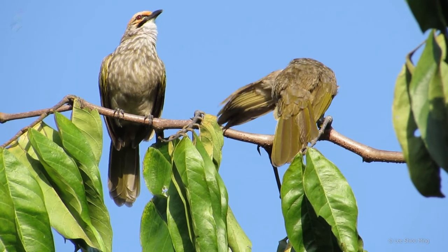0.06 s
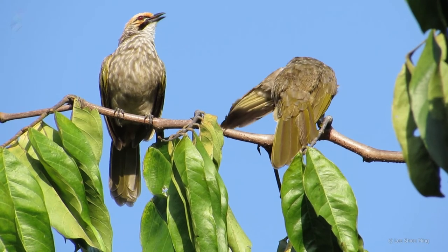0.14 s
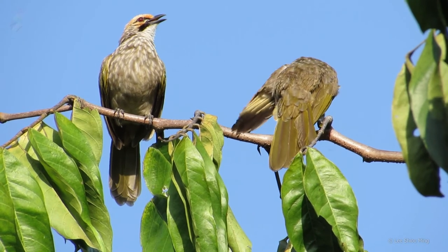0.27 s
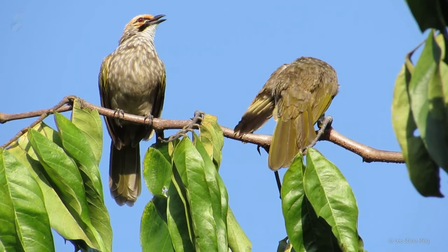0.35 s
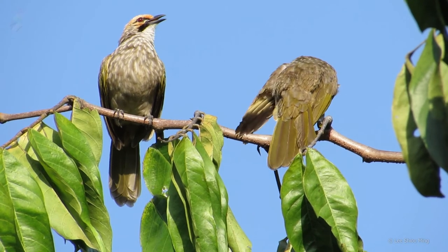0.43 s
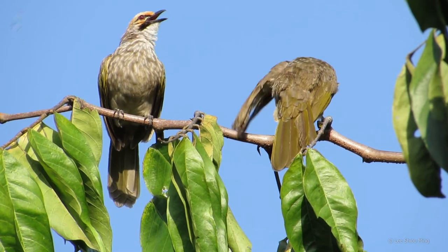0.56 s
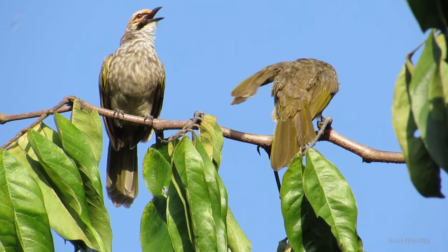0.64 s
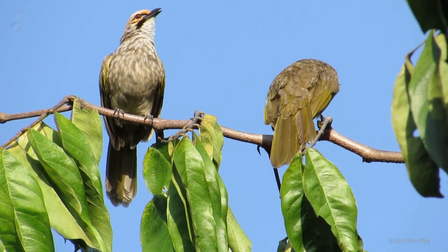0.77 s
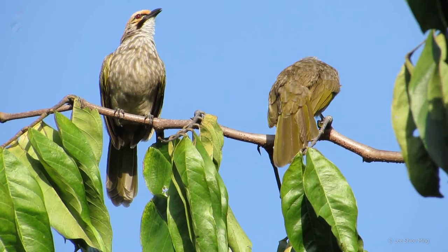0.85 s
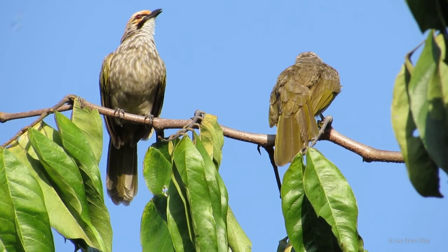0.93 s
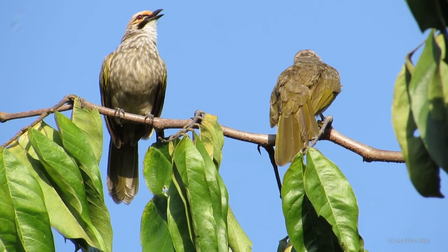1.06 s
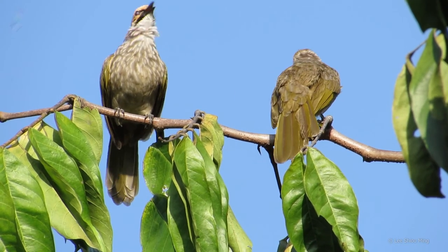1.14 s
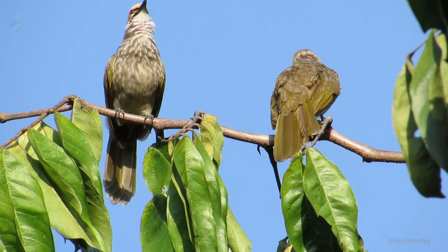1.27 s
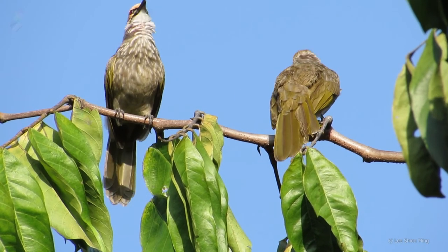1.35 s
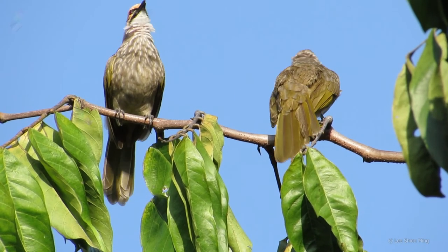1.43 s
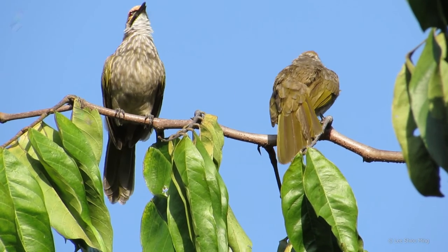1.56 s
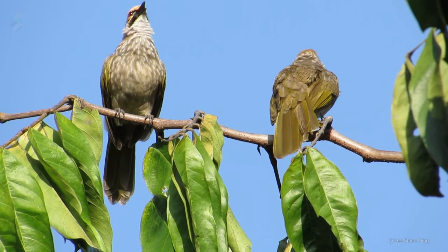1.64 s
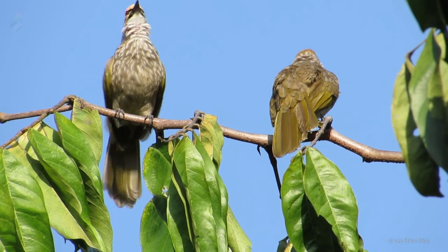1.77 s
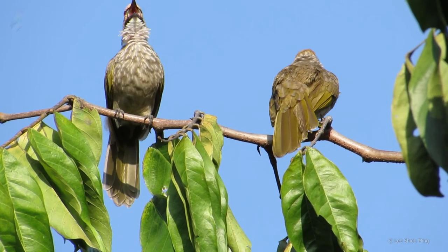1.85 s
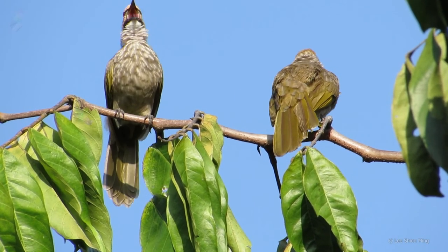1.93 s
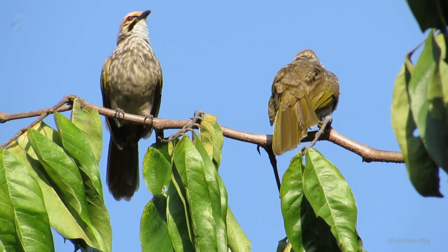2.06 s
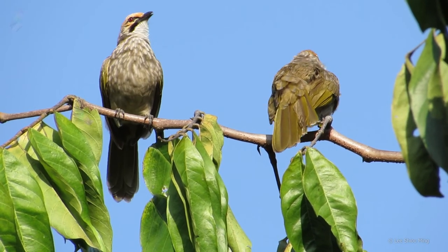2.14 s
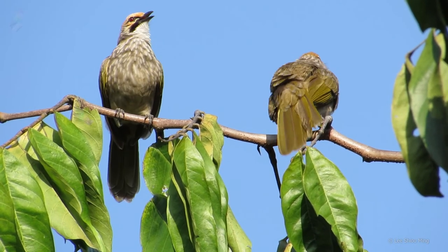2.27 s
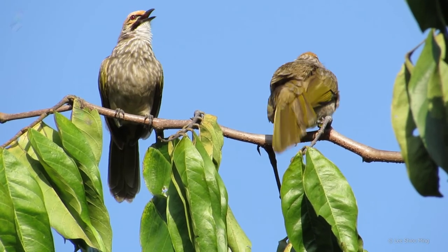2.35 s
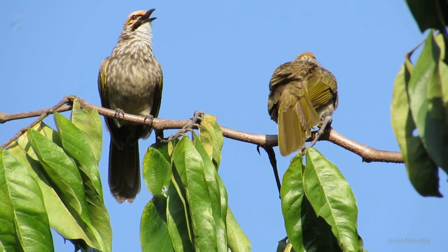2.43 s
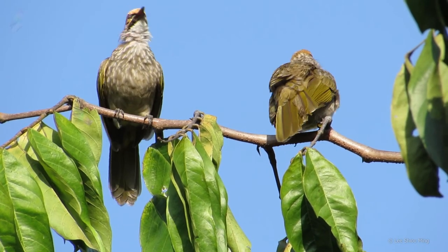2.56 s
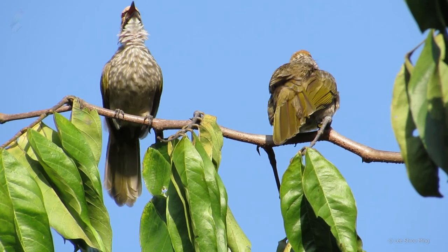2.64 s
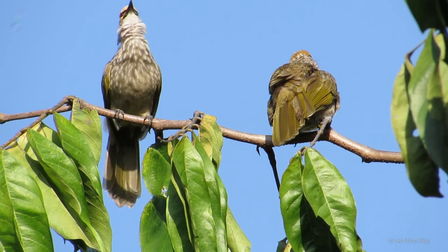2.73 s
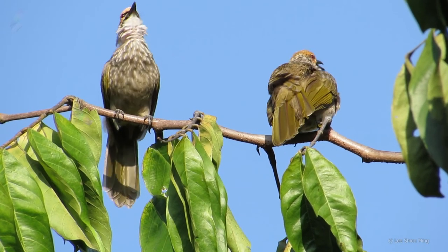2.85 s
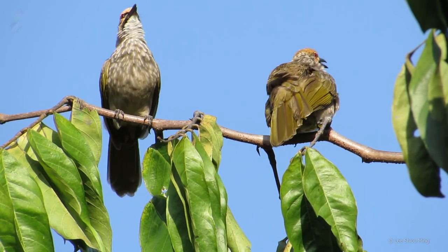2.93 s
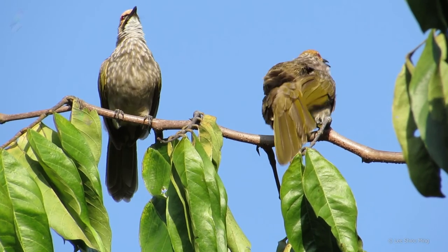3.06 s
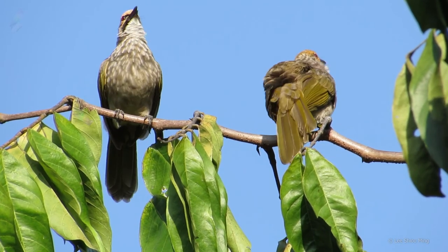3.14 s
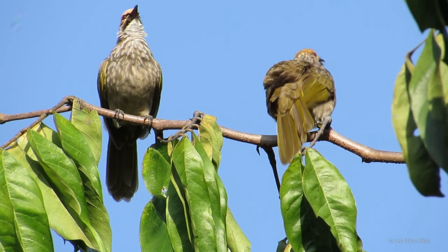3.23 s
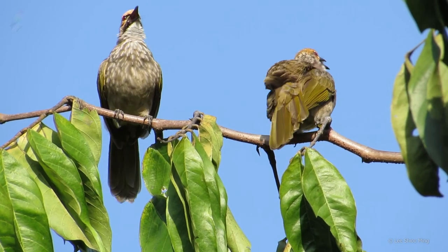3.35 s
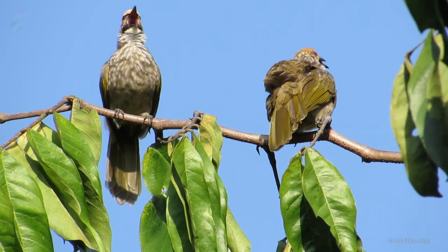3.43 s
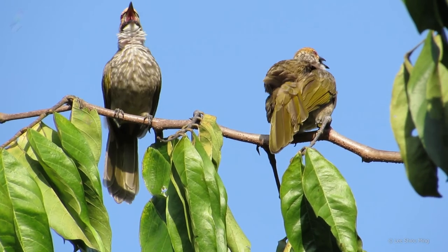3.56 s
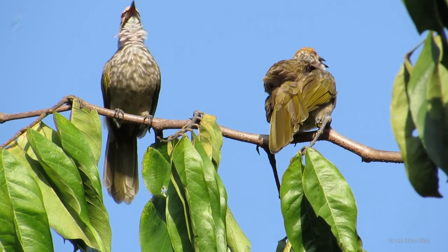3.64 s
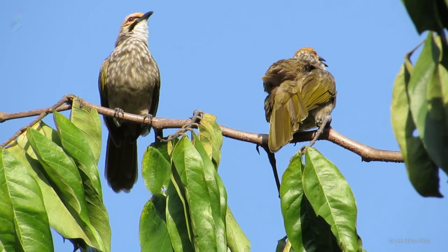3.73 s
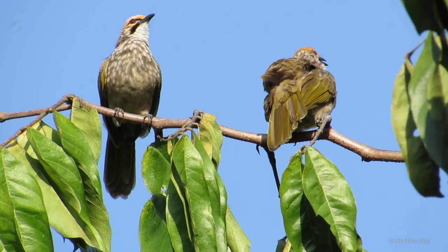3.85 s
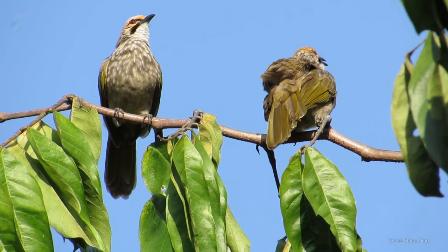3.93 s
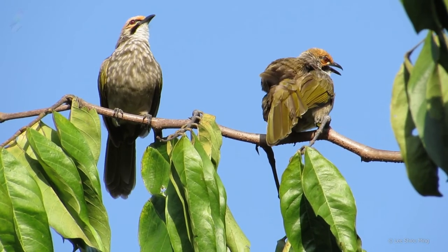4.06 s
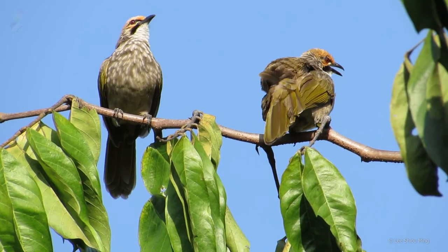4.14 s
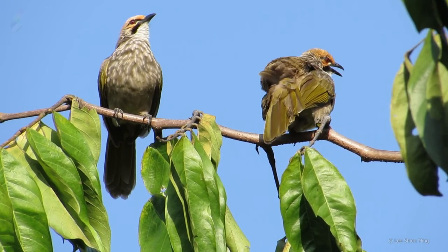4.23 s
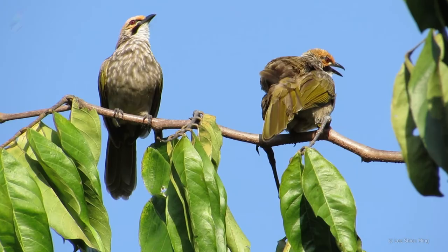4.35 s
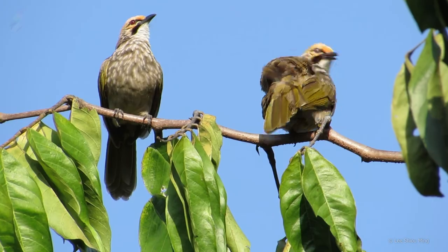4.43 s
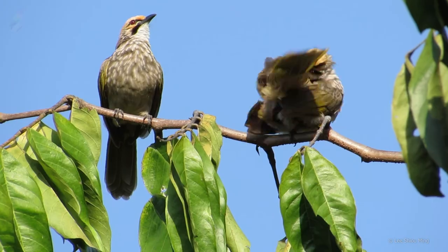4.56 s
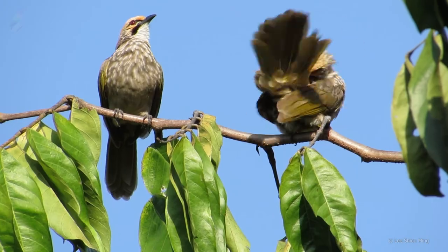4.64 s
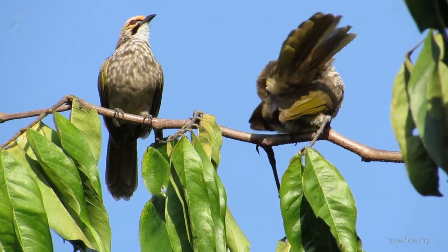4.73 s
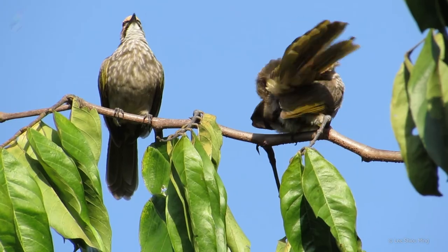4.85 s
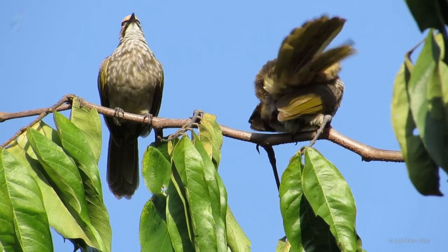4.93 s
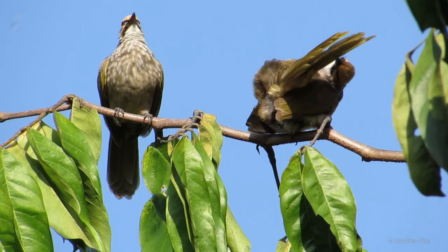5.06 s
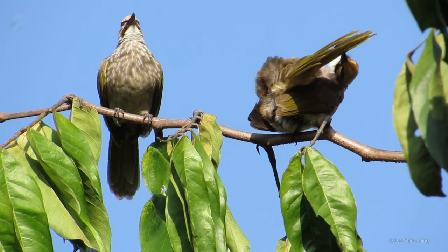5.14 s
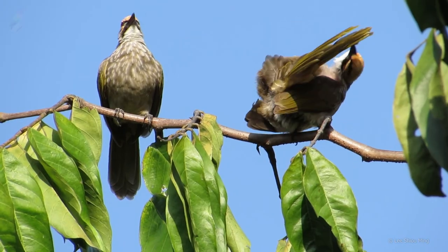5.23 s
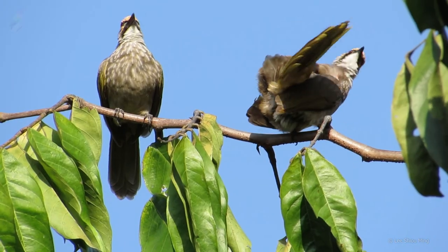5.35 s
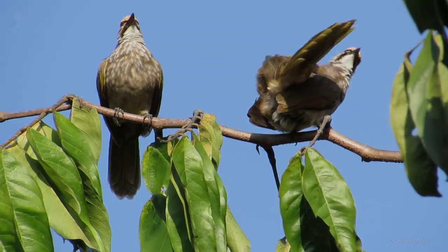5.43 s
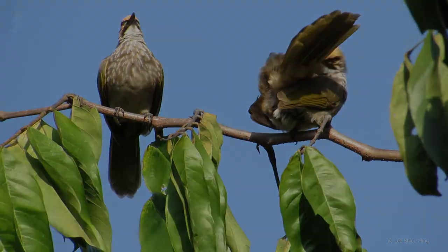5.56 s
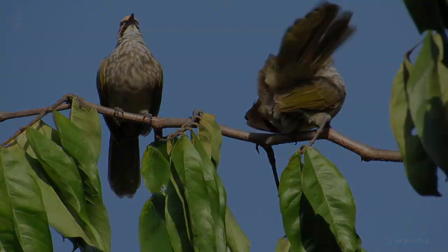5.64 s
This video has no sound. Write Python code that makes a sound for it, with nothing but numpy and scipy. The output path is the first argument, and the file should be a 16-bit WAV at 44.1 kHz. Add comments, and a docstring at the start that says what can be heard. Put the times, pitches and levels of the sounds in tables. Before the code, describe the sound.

A handheld stereo microphone catches one bulbul singing nearly straight ahead, its fluid warbles separated by short gaps and echoed by leaves and trunks. Far small birds tick and whistle faintly. Later only deep rumble, thin hiss and chips remain, with a second bird's barely audible plumage shakes, before a plastic click and tiny scuffs close the scene as the level dips slightly.

```python
"""Outdoor rumble, a wavering drone and hiss run throughout; small birds call far off from the start.
From 0.6 to 3.7 s a bulbul sings bubbling phrases: near-sine whistles with raspy overtones,
thrown back by the ground and by trees that let them ring. From 4.2 s a second bulbul ruffles its feathers
in bursts of shaped noise. Near 5.4 s a hand-held camera clicks, fingers scuff its ringing casing,
and the level sinks a little to the end."""
import sys
import numpy as np
from scipy import signal
from scipy.io import wavfile
from scipy.ndimage import uniform_filter1d

SR = 44100
rng = np.random.default_rng(int(sys.argv[2]) if len(sys.argv) > 2 else 0)


def wrap_up_sound(samples):
    """Save the sound to the file named by the first command line argument, as 16-bit audio."""
    columns = np.atleast_2d(samples).T
    # keep every value between -1 and 1, then stretch to whole-number steps
    tamed = np.clip(columns, -1, 1)
    steps = np.round(tamed * 32767).astype(np.int16)
    wavfile.write(sys.argv[1], SR, steps)


N = 250929
T = np.arange(N) / SR
SIDES = np.array([[1], [-1]])   # left, right


def from_db(db):
    """Decibels to amplitude factor."""
    return 10 ** (np.asarray(db) / 20)


def rms_one(x):
    """Scale to rms 1."""
    return x / np.sqrt(np.mean(x ** 2) + 1e-20)


def at_hz(points, hz):
    """A curve read on a log-frequency axis."""
    points = np.array(points)
    return np.interp(np.log(hz), np.log(points[:, 0]), points[:, 1])


def drift(rate):
    """Smooth random wander of spread about 1, faster at higher rate."""
    step, settle = 20, 4000   # samples per slow sample; slow samples dropped
    r = np.exp(-2 * np.pi * rate * step / SR)
    white = rng.standard_normal(N // step + settle + 2)
    slow = signal.lfilter([1], [1, -2 * r, r * r], white)[settle:]
    return np.interp(np.arange(N) / step, np.arange(len(slow)), rms_one(slow))


def band(x, low_hz, high_hz):
    """Band-pass filter."""
    edges_hz = [low_hz, min(high_hz, .45 * SR)]
    return signal.sosfilt(signal.butter(2, edges_hz, "band", fs=SR, output="sos"), x)


def ring(x, hz, t60_s):
    """Resonator: a unit click sets a decaying sine of height 1 ringing."""
    r, w = from_db(-60 / (t60_s * SR)), 2 * np.pi * hz / SR
    return signal.lfilter([0, np.sin(w)], [1, -2 * r * np.cos(w), r * r], x + 1e-18)


def gate(start_s, length_s, attack_s, release_s):
    """The samples of a sound, the time since its start, and its soft attack, hold and release."""
    at = np.flatnonzero((T >= start_s) & (T < start_s + length_s))
    t = T[at] - start_s
    opening = np.clip(np.minimum(t / attack_s, (length_s - t) / release_s), 0, 1)
    return at, t, np.sin(np.pi / 2 * opening) ** 2


def spread(mid, side, alike):
    """Left and right noise of the given likeness, from two independent noises."""
    return np.sqrt(1 + alike) * mid + np.sqrt(1 - alike) * side * SIDES


# Stereo likeness of the air noise. Each row: frequency in Hz, left-right correlation.
LIKENESS = [(40, -0.04), (120, 0.7), (300, .5), (700, 0.53), (2000, 0.26), (5000, 0.27), (10000, -0.36)]
# Stereo lean of the air noise. Each row: frequency in Hz, left minus right in dB.
LEAN = [(40, 10.2), (120, 5.4), (300, 3.3), (1000, 1.2), (4000, 0.7), (10000, .5)]


def air_noise(spectrum, patchy_db, count):
    """Stereo noise in narrow bands, each with its own flicker, likeness and lean; mono sum scaled to rms 1."""
    edges_hz = np.geomspace(spectrum[0][0], spectrum[-1][0], count + 1)
    out, white = 0, rng.standard_normal((2, 2, N))
    for k, (low_hz, high_hz) in enumerate(zip(edges_hz, edges_hz[1:])):
        mid, side = band(white[k % 2], low_hz, high_hz)
        hz = np.sqrt(low_hz * high_hz)
        alike = np.clip(at_hz(LIKENESS, hz), -1, 1)
        flicker = from_db(at_hz(spectrum, hz) + patchy_db * drift(5.0))
        lean = from_db(SIDES * at_hz(LEAN, hz) / 2)
        out = out + flicker * lean * spread(mid, side, alike)
    return out / np.std(out.mean(axis=0))


# Outdoor rumble spectrum. Each row: frequency in Hz, relative density in dB.
RUMBLE = [(20, -2), (32, -0.5), (60, 0.5), (85, -5), (120, -6), (190, -1.5), (300, -6), (480, -9),
          (660, -13.5), (840, -8), (1050, -17.5), (1600, -18.5), (2600, -33)]
# Hiss spectrum. Each row: frequency in Hz, relative density in dB.
HISS = [(1500, -11.5), (2500, 4.5), (4000, 2), (6000, -1.5), (8500, -1.5), (10200, 5), (11000, -13),
        (13500, -9), (14600, -24)]
RUMBLE_DB, RUMBLE_WANDER_DB = -39.5, 0.6
DRONE_HZ, DRONE_DB, DRONE_WANDER_DB = 44.5, -42.5, 4
HISS_DB = -55


def background(drone_t60_s=0.65, drone_lean_db=2.5):
    """Far rumble and thin hiss as shaped noise; a noise-driven resonance as a deep wavering drone."""
    drone = ring(band(rng.standard_normal(N), 36.3, 62.0), DRONE_HZ, drone_t60_s)
    # even out the level, leave the pitch loose
    drone = drone / np.sqrt(uniform_filter1d(drone ** 2, size=11000) + 1e-20)
    drone = drone * from_db(DRONE_DB + DRONE_WANDER_DB * drift(2.2)) * from_db(SIDES * drone_lean_db)
    rumble_gain = from_db(RUMBLE_DB + RUMBLE_WANDER_DB * drift(6.3))
    rumble = rumble_gain * air_noise(RUMBLE, patchy_db=2.0, count=22)
    hiss = from_db(HISS_DB) * air_noise(HISS, patchy_db=3.5, count=30)
    return rumble + drone + hiss


# Click of the camera. Each row: time in seconds, strike strength in dB.
CLICKS = [(5.407, -24.5)]
# Casing resonances. Each row: frequency in Hz, relative level in dB, T60 in seconds.
CASING = [(1450, -10, 0.055), (1890, -5.5, 0.022), (2460, -2.5, 0.018), (2890, 1, 0.019),
          (3200, -14, 0.043), (4440, -2, 0.0082), (4840, -8, 0.015), (8500, -17, 0.021), (12800, -20, .008)]
# Finger scuffs. Each row: centre in seconds, Gaussian spread in seconds, level in dB.
SCUFFS = [(5.517, 0.011, -52), (5.598, 0.0028, -42), (5.622, .012, -47)]


def casing(x):
    """The casing's resonances ring in parallel."""
    return sum(from_db(db) * ring(x, hz, t60_s) for hz, db, t60_s in CASING)


def camera():
    """An impulse clicks the casing; noise bursts for finger scuffs ring the same resonances."""
    push = np.zeros(N)
    for time_s, db in CLICKS:
        push[int(time_s * SR)] = from_db(db)
    rub = sum(from_db(db) * np.exp(-.5 * ((T - s) / spread_s) ** 2) for s, spread_s, db in SCUFFS)
    return rub * rms_one(casing(rng.standard_normal(N))) - casing(push)


# Plumage rustle spectrum. Each row: frequency in Hz, relative density in dB.
FEATHERS = [(2500, -2), (4500, -1), (7000, 2.5), (10000, -1), (13000, 2), (15000, -22)]
# Shakes while preening. Each row: start in seconds, length in seconds, level in dB.
RUFFLES = [(4.22, 0.29, -59), (4.516, 0.1, -51.5), (4.588, 0.12, -51.5), (5.197, .25, -60)]
RUFFLE_EDGE_S = 0.037


def feathers(flicker_db=1.0):
    """Each shake of the plumage is a soft-edged burst of bright noise."""
    shaking = np.zeros(N)
    for start_s, length_s, db in RUFFLES:
        at, _, opening = gate(start_s, length_s, RUFFLE_EDGE_S, RUFFLE_EDGE_S)
        shaking[at] += from_db(db) * opening
    return shaking * from_db(flicker_db * drift(40)) * air_noise(FEATHERS, patchy_db=-4.5, count=9)


GROUND_DELAY_S, GROUND_DB = .009, -12


def ground(x):
    """One clean, slightly later copy off the ground, which makes gliding whistles beat."""
    return from_db(GROUND_DB) * np.interp(T - GROUND_DELAY_S, T, x, left=0)


# Echoes from foliage and trees. Each row: delay in seconds, relative level in dB.
ECHOES = [(0.015, -9), (0.037, -11), (0.059, -12.5), (.074, -11.5), (0.116, -12)]
# Echo strength over pitch. Each row: frequency in Hz, gain in dB.
ECHO_COLOUR = [(700, -3.5), (1200, -1.5), (1800, -2.5), (6500, -4)]
# Ring of the wood. Each row: frequency in Hz, T60 in seconds.
WOOD_T60 = [(800, 1.85), (1800, 1.43), (3000, 1.17), (6500, 0.68), (14000, .3)]


def trees(x, tail_db, echo_db, alike=0.59, build_s=0.0047, dull_hz=6000, smear_s=0.0026):
    """A few echoes smeared by foliage, plus scatter from leaves and trunks that dies sooner in the treble."""
    t = T[:int(1.5 * SR)]
    edges_hz = np.geomspace(500, 16000, 11)
    white, scatter, echo_power = rng.standard_normal((2, 2, len(t))), 0, 0
    for delay_s, db in ECHOES:
        smear = (t > delay_s) * np.exp(-np.abs(t - delay_s) / smear_s) / smear_s
        echo_power = echo_power + from_db(2 * (db + echo_db)) * smear
    for k, (low_hz, high_hz) in enumerate(zip(edges_hz, edges_hz[1:])):
        hz = np.sqrt(low_hz * high_hz)
        decay = np.exp(-np.log(1000) * t / at_hz(WOOD_T60, hz))
        tail = from_db(tail_db) * (1 - np.exp(-t / build_s)) * decay
        power = tail ** 2 + echo_power * from_db(at_hz(ECHO_COLOUR, hz)) ** 2
        scatter = scatter + band(white[k % 2], low_hz, high_hz) * np.sqrt(power / SR)
    mid, side = scatter
    response = spread(mid, side, np.clip(alike, 0, 1))
    dulling = signal.butter(1, min(dull_hz, .45 * SR), fs=SR, output="sos")
    response = signal.sosfilt(dulling, response)
    return signal.fftconvolve(x[None], response, axes=1)[:, :N]


# Distant gliding whistles; the first row is the fading end of a note begun before the start. # Each row: start
# in seconds, length in seconds, start Hz, end Hz, # relative level in dB, fade over the note in dB (negative
# swells).
FAR_NOTES = [ (0.0, 0.046, 1030, 960, -28, 42), (0.0, 0.063, 3030, 3100, -48, 9),
             (0.112, 0.072, 3440, 4100, -42.5, 1), (0.18, .19, 3520, 2170, -46, -5),
             (0.422, .05, 2370, 2570, -35, 20), (4.875, 0.057, 8700, 8100, -68, -17),
             (4.994, .06, 4270, 3130, -52, -2), (5.124, 0.067, 8500, 7400, -54, 0),
             (5.33, 0.065, 4100, 3200, -49, 2), ]
# Bouts of steady double chips. Each row: start in seconds, length in seconds, period in seconds,
# relative level in dB.
CHIP_BOUTS = [(0.089, 2.3, .35, -49), (3.931, 1.75, .337, -53)]
CHIP_HZ = 4720


def far_birds(jitter=0.019, edge_s=0.015, chip_gap_s=0.031, chip_s=0.026, chip_rise_hz=90):
    """Gliding sines that flicker through the leaves; a chip is two short rising notes, the second higher."""
    chips = []
    for first_s, bout_s, period_s, db in CHIP_BOUTS:
        for start_s in np.arange(first_s, first_s + bout_s, period_s):
            for i in range(2):
                hz = CHIP_HZ + i * chip_rise_hz
                chips.append((start_s + i * chip_gap_s, chip_s, hz, hz + chip_rise_hz, db, 0))
    out, waver = np.zeros(N), 1 + jitter * drift(150)
    for start_s, length_s, start_hz, end_hz, level_db, fade_db in [*FAR_NOTES, *chips]:
        at, t, opening = gate(start_s, length_s, edge_s, edge_s)
        hz = (start_hz + (end_hz - start_hz) * t / length_s) * waver[at]
        whistle = np.sin(2 * np.pi * np.cumsum(hz) / SR)
        out[at] += opening * from_db(level_db - fade_db * t / length_s) * whistle
    return out * from_db(3.5 * drift(50) - 1)


# Fast syrinx flutter. Each row: start in seconds, length in seconds, pitch swing as a share.
FLUTTERS = [(0.681, .11, .015), (1.558, 0.1, 0.016), (1.88, 0.16, 0.016), (2.676, 0.26, 0.012),
            (3.308, 0.12, 0.017)]
FLUTTER_HZ, FLUTTER_EDGE_S = 102, 0.034


def flutter():
    """Bursts of fast, regular pitch wobble from the syrinx."""
    swing = np.zeros(N)
    for start_s, length_s, share in FLUTTERS:
        at, _, opening = gate(start_s, length_s, FLUTTER_EDGE_S, FLUTTER_EDGE_S)
        swing[at] += share * opening
    return swing * np.sin(2 * np.pi * FLUTTER_HZ * T)


def progress(t, length_s):
    """Runs from 0 to 1 over the given length, then stays."""
    return np.clip(t / max(length_s, 1e-4), 0, 1)


SLIDE_POWER = 2.1   # slide starts fast, eases into the held pitch


def note_pitch(t, onset_hz, held_hz, end_hz, slide_s, hold_s, bend_s):
    """A quick slide into the held pitch, then an S-shaped bend to the end pitch."""
    slide = (1 - progress(t, slide_s)) ** SLIDE_POWER
    bend = np.sin(np.pi / 2 * progress(t - slide_s - hold_s, bend_s)) ** 2
    return held_hz + (onset_hz - held_hz) * slide + (end_hz - held_hz) * bend


SWELL_DB, DECLINE_DB = 6.5, 9.5   # rise to the peak, fall from it


def note_effort_db(t, length_s, peak_s):
    """Effort swells quickly, rounds off at its peak and declines steadily."""
    swell_db = -SWELL_DB * (1 - progress(t, peak_s)) ** 2
    return swell_db - DECLINE_DB * progress(t - peak_s, length_s - peak_s)


# Throat and open beak. Each row: frequency in Hz, overtone gain in dB.
BEAK = [(1800, 17.5), (2700, 8), (3500, 1), (4300, -0.5), (5100, -8), (5900, 8), (6700, 7), (7500, 5.5),
        (8300, -7.5), (9300, 10), (10400, -2), (11100, -5.5), (11900, 2), (12800, 2), (13800, -9.5),
        (15000, -17)]
# The bulbul's notes. Each row: start in seconds, length in seconds, onset Hz, held Hz, end Hz,
# slide in seconds, hold in seconds, bend in seconds, peak time after start in seconds,
# relative peak level in dB, relative overtone level in dB, overtone brightening over the note in dB.
NOTES = [ (0.583, 0.029, 1490, 1500, 1543, 0.0048, .003, 0.017, 0.015, -36.5, -65, 0),
         (0.619, 0.16, 1883, 1708, 2060, .035, 0.011, .100, 0.038, -20, -67, -2),
         (0.955, 0.051, 807, 986, 1060, 0.035, 0.0018, .020, 0.023, -40, -64, 6),
         (1.064, 0.17, 1262, 994, 1594, 0.021, 0.009, 0.038, .022, -36.5, -80, -8),
         (1.212, .036, 1415, 1401, 1335, 0.01, 0.0052, .020, 0.041, -20, -43, -6),
         (1.239, .246, 1348, 908.3, 1154, 0.058, 0.014, 0.14, 0.046, -20, -55.5, 19),
         (1.563, 0.025, 1520, 1490, 1455, 0.0063, 0.0039, 0.018, 0.016, -23.5, -71, -5),
         (1.584, 0.051, 1440, 1337, 1510, .018, 0.0071, 0.022, 0.023, -22, -58, -14),
         (1.637, 0.057, 1784, 1315, 1350, 0.0127, 0.024, 0.022, 0.016, -21, -62.5, -5),
         (1.732, 0.019, 1325, 1339, 1320, 0.0025, 0.0026, 0.013, 0.008, -22.5, -62, -3),
         (1.764, 0.052, 1183, 893, 933, 0.016, 0.0036, 0.014, 0.012, -21.5, -54, 5),
         (1.833, 0.065, 878, 1450, 1500, 0.034, 0.0055, 0.013, 0.071, -16, -44, 13.5),
         (1.891, 0.14, 1682, 1802, 2127, .015, .030, .090, 0.01, -9, -40, 1),
         (2.239, .120, 945, 791, 1155, 0.034, 0.0024, 0.045, 0.088, -19.5, -52, 3),
         (2.423, 0.16, 1858, 1248, 1557, 0.015, 0.035, 0.048, 0.11, -13.5, -48, -12.5),
         (2.656, 0.11, 1470, 1404, 1333, 0.022, .015, 0.053, 0.035, -19.5, -47, -17),
         (2.729, 0.059, 1923, 1648, 1500, .010, 0.0072, 0.025, 0.011, -11, -42.5, -1),
         (2.789, 0.094, 1268, 1083, 877, .012, 0.006, 0.069, 0.041, -19.5, -62, -12),
         (2.896, 0.042, 910, 1065, 1137, 0.031, 0.00072, 0.0083, 0.046, -22.5, -65, -5),
         (3.117, 0.13, 1542, 1207, 776, 0.025, 0.039, 0.08, 0.099, -17, -55, -12),
         (3.288, 0.088, 1280, 1491, 2063, .010, 0.0014, .030, 0.025, -11, -45.5, 21),
         (3.484, 0.093, 3027, 2530, 2048, .020, 0.0005, .062, 0.054, -10.5, -32, -9.5),
         (3.582, 0.062, 2038, 2191, 2205, 0.022, 0.012, .015, 0.024, -9.5, -33.5, 2),
         (3.632, 0.082, 2240, 1667, 1720, .046, 0.015, 0.024, 0.038, -11.5, -42.5, 7), ]
ATTACK_S, RELEASE_S = 0.0026, 0.0066
FULLY_ROUGH_DB, ROUGHER_PER_DB = -45.703, 0.37   # the harder a note is pressed, the more it trembles
OVERTONE_FOLLOWS = 0.95   # share of the effort that overtones follow
OVERTONE_FALL_DB = 1   # per overtone above the third harmonic


def bulbul(jitter=0.0062, wander=0.0065, shimmer_db=3.0, whistle_db=-2.23, overtone_db=0.5,
           even_db=-1.5, symmetry_db=12, purity_db=11, uneven_db=3.5, rasp=0.27, rasp_growth=0.97):
    """The syrinx gives a near sine; pressed notes add uneven, raspy overtones shaped by throat and beak."""
    tremble, wobble = jitter * drift(160) + wander * drift(31), flutter()
    unsteady_db = shimmer_db * drift(61)
    out, k = np.zeros(N), np.arange(2, 13)[:, None]   # k: harmonic numbers
    above_third = np.maximum(k - 3, 0)
    uneven = np.array([drift(17) for _ in k])
    # turbulence spreads each overtone into a haze, the upper ones most
    turbulence = rms_one(band(rng.standard_normal((len(k), N)), 81, 610))
    haze = rasp * (k / 3) ** rasp_growth
    for start_s, length_s, *contour, peak_s, peak_db, pressed_db, brightening_db in NOTES:
        at, t, opening = gate(start_s, length_s, ATTACK_S, RELEASE_S)
        # relaxed notes are cleaner and steadier
        rough = np.clip(1 + ROUGHER_PER_DB * (pressed_db - FULLY_ROUGH_DB), .2, 1)
        hz = note_pitch(t, *contour) * (1 + rough * tremble[at] + wobble[at])
        phase = 2 * np.pi * np.cumsum(hz) / SR
        effort_db = note_effort_db(t, length_s, peak_s)
        level_db = peak_db + effort_db + whistle_db
        bright_db = pressed_db + OVERTONE_FOLLOWS * effort_db + brightening_db * (t / length_s - .5)
        height_octaves = np.maximum(np.log2(hz / 1700), 0)
        # membranes swing almost symmetrically, more so on high notes: weaker even harmonics
        source_db = (even_db - symmetry_db * height_octaves) * (k % 2 == 0)
        # higher notes lose their upper overtones faster
        source_db = source_db - (OVERTONE_FALL_DB + purity_db * height_octaves) * above_third
        weights = from_db(source_db + at_hz(BEAK, k * hz)) * (k * hz < SR / 2)
        weights = weights / np.sqrt((weights ** 2).sum(axis=0).mean())
        raspy = (1 + haze * turbulence[:, at]) / np.sqrt(1 + haze ** 2)
        strength = from_db(uneven_db * uneven[:, at]) * raspy
        overtones = (weights * strength * np.sin(k * phase)).sum(axis=0)
        voice = from_db(level_db) * np.sin(phase) + from_db(bright_db + overtone_db) * overtones
        out[at] += np.sqrt(2) * opening * from_db(rough * unsteady_db[at]) * voice
    return out


def scene():
    """The singer almost straight ahead; other birds deep among the trees, heard mostly as scatter."""
    song, far = bulbul(), far_birds()
    near = song + ground(song) + trees(song, tail_db=0.7, echo_db=-0.5)
    near = near * from_db(SIDES * .3)
    distant = 0.69 * far + trees(far, tail_db=-9.0, echo_db=1.0, alike=.6)
    return near + distant + feathers() + camera() * from_db(SIDES * 1.0) + background()


def gain_control(x, threshold_db=-21, share=0.22, excess_release_db_per_s=16):
    """Loud notes push the gain down by a share of their excess; it creeps back as the held excess drains."""
    power = uniform_filter1d(np.mean(x ** 2, axis=0), size=880)
    level_db = 10 * np.log10(np.abs(power) + 1e-12)
    over_db = np.maximum(level_db - threshold_db, 0)
    drain_db = excess_release_db_per_s * T
    held_db = np.maximum.accumulate(over_db + drain_db) - drain_db
    return x * from_db(-share * uniform_filter1d(held_db, size=440))


# Narrow notches. Each row: frequency in Hz, Q.
NOTCHES = [(3970, 11.3), (8020, 30)]
# Closing level change. Each row: time in seconds, gain in dB.
FADE = [(5.42, 1.5), (5.69, -2.5)]
CUTOFF_HZ = 14850


def record(dry):
    """Two narrow notches, gain control, a slight closing fade and a steep treble cut."""
    for hz, q in NOTCHES:
        dry = signal.lfilter(*signal.iirnotch(hz, q, fs=SR), dry)
    times_s, gains_db = np.transpose(FADE)
    out = gain_control(dry) * from_db(np.interp(T, times_s, gains_db))
    return signal.sosfilt(signal.ellip(10, .3, 80, CUTOFF_HZ, fs=SR, output="sos"), out)


dry = scene()
out = record(dry)
wrap_up_sound(out)
```